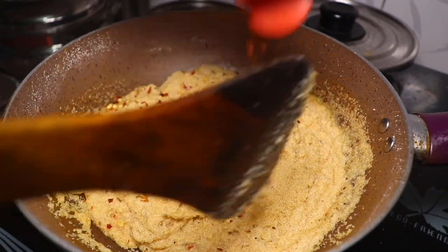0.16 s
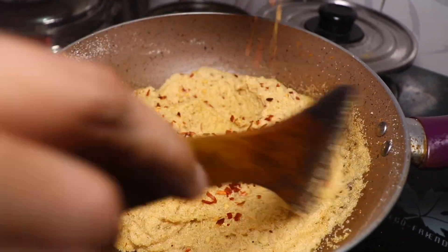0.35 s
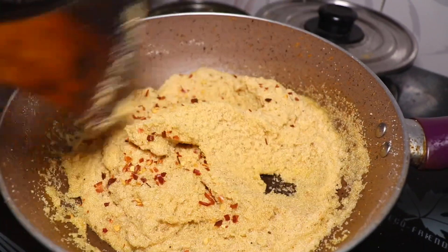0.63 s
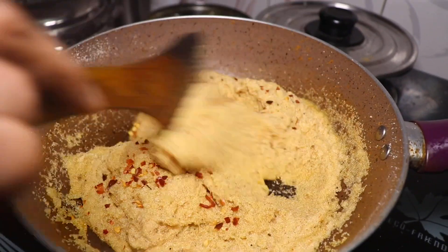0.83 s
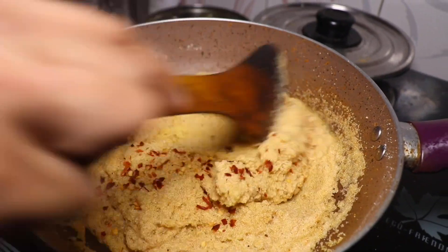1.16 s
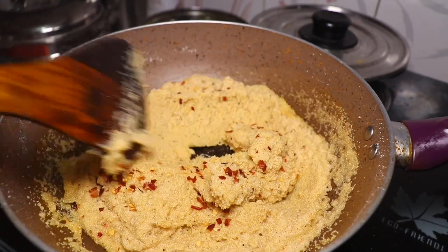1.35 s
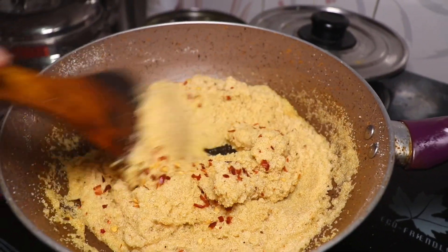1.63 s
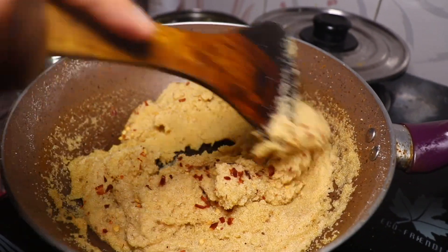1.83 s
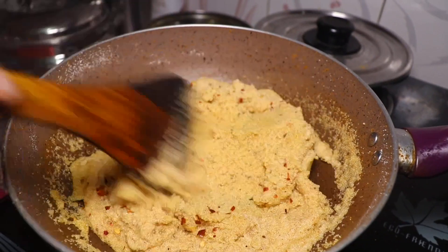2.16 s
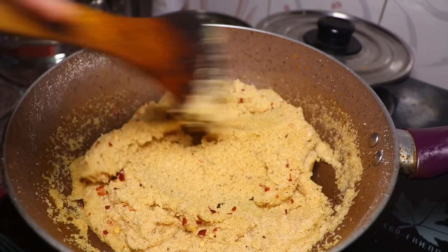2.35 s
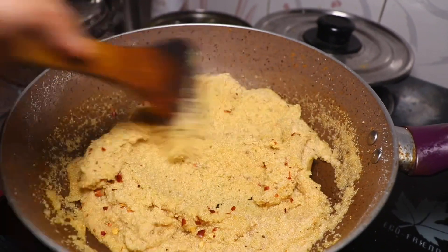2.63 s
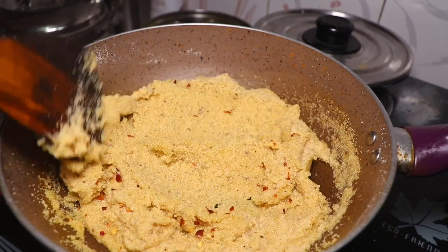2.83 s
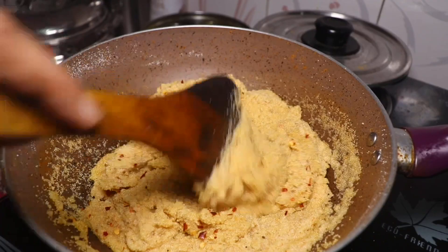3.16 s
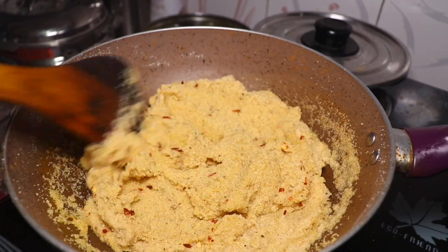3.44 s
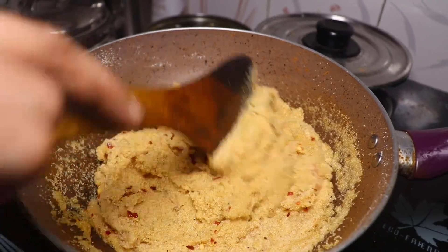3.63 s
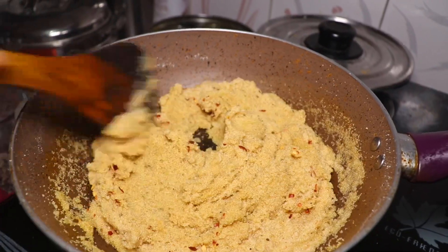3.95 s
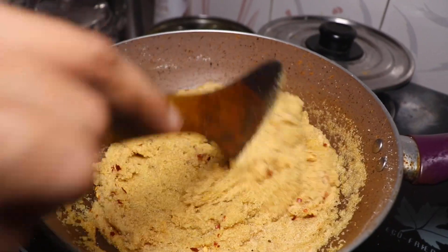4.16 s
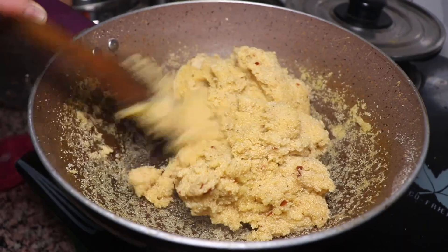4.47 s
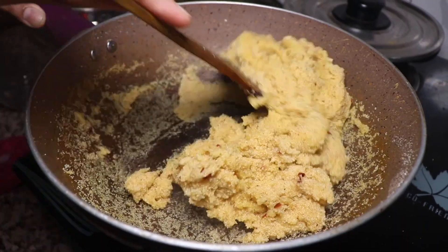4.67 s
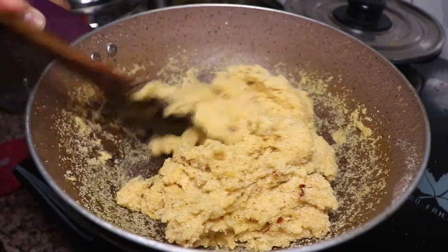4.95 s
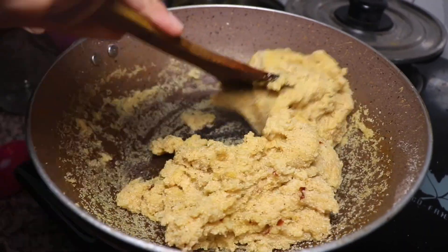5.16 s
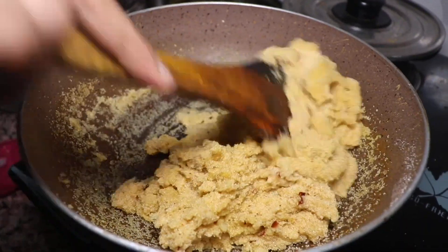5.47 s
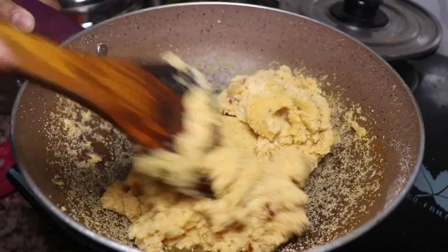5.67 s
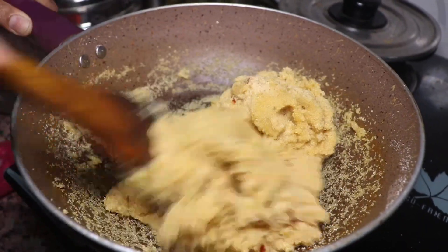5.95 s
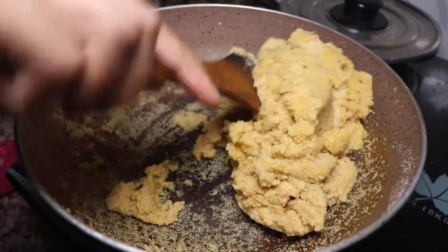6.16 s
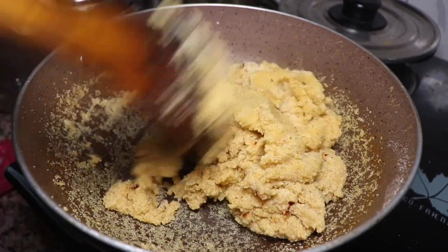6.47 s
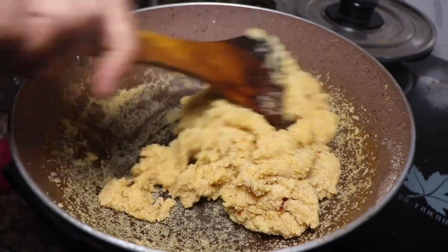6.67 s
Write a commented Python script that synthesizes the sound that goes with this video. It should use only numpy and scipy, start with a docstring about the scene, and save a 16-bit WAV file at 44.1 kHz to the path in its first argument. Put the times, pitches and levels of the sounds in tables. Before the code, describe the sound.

From 0 to about 0.7 seconds, dry, bright rustling with tiny sharp ticks sits over a quiet room hush and a faint narrow hiss. At 0.8 a wooden spatula first knocks the coated pan, and stirring begins. Short woody knocks with a quickly damped metallic ring come in uneven clusters around 1.3, 1.7, 2.1, 2.6 and 3.0, the hits at 1.67 and 3.04 stronger. Dull, gritty drags through thick dough join them, with low stove rumble swelling under the pushes. A thin hiss returns near 3 seconds. After sparser knocks from 3.5, a very loud, hard clack lands at 4.45 with a rough scraping tail. Knocks then crowd together until 5.3, with a strong one at 5.04. Further hits at 5.84 and 6.0 bring coarse scraping, then softer taps until 6.8. Close microphone, small tiled kitchen, short tail.

```python
"""Dry rustling, room hush and a faint hiss come first; then wood knocks and scrapes as thick dough is stirred.
A wooden spatula in a coated pan, an arm's length away in a small kitchen, rings metal modes the dough damps.
Random clicks drive the same modes for the scrape, and each push through the dough swells a low stove rumble.
Filtered random grains make the rustle and the bright top of some knocks, the hush is bands of noise,
and the narrow hiss is noise on a drifting pitch."""
import sys
import numpy as np
from scipy import signal
from scipy.io import wavfile
from scipy.ndimage import uniform_filter1d

SR = 44100
rng = np.random.default_rng(int(sys.argv[2]) if len(sys.argv) > 2 else 0)


def generate_wav(signal):
    """Clip the signal to [-1, 1] and save it as 16-bit WAV at the path in sys.argv[1]."""
    frames = np.transpose(np.atleast_2d(signal))
    scaled = np.clip(frames, -1, 1) * 32767
    pcm = np.round(scaled).astype(np.int16)
    wavfile.write(sys.argv[1], SR, pcm)


N = 300232  # length in samples

# Colour of the room hush. Each row: frequency in Hz, relative level in dB for equal widths in Hz.
HUSH_COLOUR = [(15, -35), (25, 7), (40, 5), (87, -28), (166, -20), (242, 7.5), (384, -2), (591, 2),
               (818, -10), (1040, -7.5), (4870, -18.5), (9570, -16.5), (13600, -19.5), (16000, -8)]
HUSH_DB = -63
# Bursts of dry high noise; some are the bright top of a knock.
# Each row: peak time in seconds, gain in dB, seconds to rise 20 dB, seconds to fall 20 dB.
TREBLE_BURSTS = [(0, -44, .02, .03), (.022, -49, .03, .07), (.13, -47.5, .014, .09), (.188, -48, .03, .15),
                 (.238, -50, .1, .07), (.38, -55.5, .18, .14), (.678, -55, .1, .1), (.81, -58, .02, .015),
                 (1.68, -65, .02, .12), (2.11, -70, .04, .2), (2.3, -70, .2, .3), (3.63, -69, .02, .25),
                 (4.09, -66, .1, .1), (4.39, -62, .01, .05), (4.5, -65.5, .05, 1.5), (5.04, -62, .008, .03),
                 (5.11, -67, .15, .5), (5.265, -60, .06, .2), (5.52, -66.5, .06, .12),
                 (5.685, -60, .05, .09), (5.77, -64, .2, .12), (6.02, -60, .015, .09), (6.18, -68, .5, .11),
                 (6.29, -69, .02, .6), (6.4, -65.5, .1, .2), (6.56, -63, .012, .012),
                 (6.625, -60, .006, .03), (6.73, -73.5, .15, .06), (6.79, -65, .035, .12)]
# Faint rustle between the bursts. Each row: time in seconds, gain in dB.
RUSTLE_REST = [(0, -66), (.5, -67), (.78, -74), (1.3, -76), (2.6, -78), (3.1, -75), (4.3, -77), (5, -85),
               (6.81, -86)]
# Single dry ticks in the treble. Each row: time in seconds, peak in dB.
TICKS = [(0.0233, -32.5), (0.1236, -48), (0.189, -41), (0.229, -30), (0.3436, -46), (0.5611, -44),
         (0.673, -40), (0.7114, -42), (5.104, -46), (5.283, -39), (5.521, -45), (5.681, -40),
         (6.6191, -32.5)]
# Ways the pan and spatula ring. Each row: frequency in Hz, relative strength in dB,
# seconds to fade by 60 dB before the dough damps it further.
PAN_MODES = [(242.2, -0.5, 0.58), (319, 2.5, 0.23), (482, -1, 0.36), (560.3, -3.5, 0.36), (616, -1.5, 0.06),
             (650.6, -2, 0.15), (790.7, 4.5, 0.048), (870, -1, 0.094), (962.7, 1, 0.053), (1100, -6.5, .1),
             (1232, -7, 0.055), (1360, -2.5, 0.04), (1576, -3, 0.052), (1750, -8.5, 0.11),
             (1810, -7, 0.091), (1972, 1.5, 0.027), (2130, -3, 0.049), (2310, -2.5, 0.036),
             (2394, -7, 0.16), (2491, 0.5, 0.03), (2814, 6, 0.02), (3180, 11.5, 0.02), (3870, 1.5, 0.02),
             (4135, 2.5, 0.07), (4814, 4, 0.017), (5400, -9, 0.017), (6675, 14.5, 0.048),
             (7220, -25.5, 0.016)]
# Borders between thud, body, ring and crack, in Hz.
BAND_EDGES_HZ = [400, 1200, 3000]
# Strokes through the dough. Each row: peak time in seconds, low scrape, high scrape and fine grit gains in dB
# (before the trims in scrape), seconds to fall 20 dB.
STROKES = [(0.83, -47.5, -54, -62, .045), (0.95, -52, -50.5, -65, .11), (1.33, -53, -60, -65.5, .35),
           (1.74, -58, -61, -69, .6), (2.12, -49.5, -61, -68, .27), (2.3, -66, -61, -72, .6),
           (2.64, -53, -62, -70, .25), (3.06, -44, -51, -65, .19), (3.56, -55, -63, -70, .2),
           (3.69, -62, -61, -69, .3), (3.88, -53, -62, -68, .2), (4.1, -43.5, -46, -64, .12),
           (4.26, -59, -68, -73, .2), (4.49, -51, -62, -63, .4), (4.59, -47, -54, -63, .4),
           (4.8, -55, -59, -68, .3), (4.93, -54, -68, -73, .3), (5.06, -43.5, -49, -70, .15),
           (5.68, -57, -70, -64, .12), (6.04, -46.5, -58, -74, .3), (6.33, -60, -70, -67.5, .2),
           (6.79, -59, -66, -63, .2)]
STROKE_RISE_S = 0.035  # to rise 20 dB
# Steady drag of the blade between strokes. Each row: time in seconds, low scrape gain in dB,
# fine grit gain in dB (before the trims in scrape).
DRAG_LEVEL = [(0, -70, -66), (.19, -60, -63.5), (.55, -60, -69), (.65, -69, -70), (1.1, -69, -72),
              (1.25, -63, -71), (1.6, -65, -70), (2.5, -64, -73), (2.9, -62, -68), (3.3, -72, -71),
              (4.1, -72, -72), (4.4, -62, -71), (5.36, -61, -69), (5.52, -74, -85), (5.75, -67, -68),
              (5.97, -88, -88), (6.45, -65, -72), (6.81, -67, -76)]
DRAG_HIGH_DB = -2  # high scrape compared with low scrape
# Short rough scrapes, and the noisy tail of the loudest knock. Each row: start in seconds,
# start of the fade-out in seconds, low scrape, high scrape and fine grit gains in dB.
ROUGH_SCRAPES = [(1.282, 1.312, -46.5, -50.5, -67), (1.721, 1.748, -49, -55, -76),
                 (4.466, 4.51, -48, -50, -53), (4.533, 4.589, -49, -50, -59), (4.59, 4.656, -46, -57, -68),
                 (5.038, 5.15, -67, -66, -74), (6.013, 6.08, -53.5, -51.5, -60.5),
                 (6.079, 6.119, -44, -56, -67), (6.111, 6.16, -47, -55.5, -64.5),
                 (6.365, 6.415, -54.5, -67, -75)]
# Pushes that shake the stand. Each row: peak time in seconds, level in dB.
PUSHES = [(.2, -66), (.83, -62), (.95, -60), (1.12, -56.5), (1.33, -56), (1.52, -61), (1.78, -57),
          (1.93, -61), (2.48, -67), (2.63, -62), (2.92, -62), (3.07, -59.5), (3.2, -60), (3.6, -60),
          (3.73, -64.5), (4.21, -63), (4.48, -59), (4.65, -59), (4.84, -63), (5.06, -58), (5.22, -63),
          (5.57, -64), (5.67, -63.5), (5.87, -64), (6.05, -58), (6.13, -59), (6.22, -58), (6.45, -63.5)]
PUSH_RISE_S, PUSH_FALL_S, STOVE_REST_DB = 0.12, 0.18, -72  # to rise and fall 20 dB; level at rest
# A faint narrow hiss, in three spells. Each row: time in seconds, centre in Hz, gain in dB before the part gains.
WHISTLE = [
    [(0.12, 1450, -68), (0.202, 1530, -68), (0.302, 1450, -63.5), (0.374, 1460, -64), (0.548, 1450, -70.5),
     (0.62, 1460, -73)],
    [(2.78, 1450, -82), (2.824, 1440, -71), (2.936, 1400, -67), (3.008, 1550, -72), (3.114, 1510, -69),
     (3.304, 1508, -66.5), (3.46, 1440, -65), (3.56, 1470, -68)],
    [(4.24, 1480, -69), (4.4, 1460, -69)],
]
# How often the noise in each spell takes a new value, per second: faster makes a wider hiss.
WHISTLE_RATES_HZ = [1100, 420, 400]
# Knocks. Each row: time in seconds, peak aimed for in dB, then relative levels in dB of the thud under 400 Hz,
# the body to 1.2 kHz, the ring to 3 kHz and the crack above, then the strongest body, ring and crack
# frequencies in Hz, first contact compared with the skid in dB, skid decay in seconds, and
# the dough's damping as seconds to fade by 60 dB.
KNOCKS = [(0.767, -58, -8, -2, -3, 6, 692, 1370, 4200, 2, 0.0042, 0.15),
          (0.802, -30.5, -17, -12, -12.5, -15, 604, 1180, 3220, 10, 0.0073, 0.1),
          (0.843, -42, -12, -8, -23, -13, 1110, 1200, 3200, -8, 0.005, 0.085),
          (0.932, -36, -9, -3, -9, -8, 710, 2170, 6000, -12, 0.0033, 0.11),
          (1.281, -30, -21.5, -8.5, -8, -16, 780, 2160, 3040, -8, 0.0043, 0.12),
          (1.299, -37, -9, -11, -19, -16.5, 640, 1200, 3010, 8, 0.0038, 0.27),
          (1.398, -39, -23, -15, -21, -15.5, 700, 2540, 3870, -17, 0.0047, 0.11),
          (1.442, -45, -12, -7, -12, -12, 660, 1280, 3740, -7, 0.013, 0.12),
          (1.67, -21, -31, -5.5, -17, -30.5, 1120, 1360, 3830, 5.5, 0.008, 0.054),
          (1.703, -40, -24, -6, -1, -15, 915, 2860, 3020, -9, 0.0057, 0.088),
          (1.712, -27, -16, -7.5, -7.5, -16, 690, 2390, 3230, -2.5, 0.0042, 0.2),
          (2.079, -41.5, -18, -7.5, -4, -14, 991, 2380, 3000, 5, 0.005, 0.12),
          (2.109, -36.5, -30, -0.5, -1.5, -34, 686, 1270, 3020, -14, 0.0039, 0.11),
          (2.171, -38, -18.5, -10.5, -16, -23, 637, 1350, 2900, -12, 0.0052, 0.31),
          (2.325, -46.5, -12, -7, -19, -28, 496, 1250, 4160, 6, 0.005, 0.079),
          (2.614, -36, -14.5, -9, -10.5, -16.5, 785, 1230, 3000, 4, 0.005, 0.1),
          (2.678, -32.5, -24, -7.5, -9, -21.5, 680, 1360, 2960, -3, 0.004, 0.35),
          (2.758, -45, -24, -30, -15, -18, 627, 2290, 7830, 4, 0.0027, 0.089),
          (2.82, -41.5, -16, -9, -17, -14, 650, 1300, 4200, 0.5, 0.0044, 0.21),
          (2.954, -36, -10, -5.5, -9, -10, 1110, 1300, 3140, -1, 0.0086, 0.18),
          (3.022, -27.5, -5, 6, -7, -27, 1040, 1370, 3220, -3.5, 0.0034, 0.072),
          (3.041, -23, -20.5, -8, -8, -16.5, 850, 2400, 2950, -11, 0.0042, 0.18),
          (3.145, -36, -32, -9, -17.5, -13.5, 644, 1840, 5060, -13, 0.0055, 0.24),
          (3.184, -44, -18, -4, -10, -15, 630, 1570, 3780, -2, 0.0055, 0.12),
          (3.518, -42, -15, -8, -16, -26, 590, 2950, 3160, -6, 0.0078, 0.14),
          (3.551, -37.5, -10.5, -9, -18, -19, 750, 1220, 3200, 1.5, 0.0081, 0.18),
          (3.668, -38.5, -19, -10, -15, -13, 660, 1160, 3950, -1, 0.0071, 0.085),
          (3.858, -29, -20.5, -3.5, -4, -10.5, 670, 2180, 3480, 7, 0.0056, 0.12),
          (4.085, -32.5, -23, -10.5, -9.5, -17.5, 590, 1550, 3020, 0, 0.0094, 0.16),
          (4.149, -40.5, -15, -9.5, -15, -12, 655, 2830, 4250, -10, 0.0046, 0.092),
          (4.328, -48, -14, -11, -14, -28, 875, 1460, 7140, -2, 0.0071, 0.12),
          (4.386, -51.5, -18, -6, -23, -12, 794, 1600, 5360, -2, 0.004, 0.12),
          (4.449, -5, -36, -20.5, -10.5, -18.5, 840, 1936, 5130, -1.5, 0.0064, 0.11),
          (4.51, -24.5, -16, -15, -7, -20, 789, 1910, 4120, 22, 0.005, 0.12),
          (4.631, -27.5, -16.5, -5, -14, -26, 810, 2470, 3060, 7, 0.0063, 0.2),
          (4.683, -29, -40, -8.5, -8, -19, 836, 2400, 3960, 10, 0.0043, 0.14),
          (4.727, -28.5, -43, -1.5, -11.5, -29, 844, 1290, 3040, 0, 0.0044, 0.19),
          (4.914, -44, -19, -1, -3, -25, 780, 1310, 6870, 0, 0.0045, 0.12),
          (4.941, -32, -22, -7, -9.5, -27, 1100, 1330, 3480, 5, 0.007, 0.068),
          (4.977, -30.5, -11, 1, 1, -44, 720, 1700, 3000, -5, 0.008, 0.12),
          (5.037, -21.5, -16.5, -3, -4, -3, 1020, 1710, 3230, 5, 0.0039, 0.13),
          (5.109, -37, -18, -9.5, -9.5, -16, 821, 1210, 2970, 5, 0.005, 0.12),
          (5.159, -38.5, -25.5, -1, -24, -23, 750, 1190, 3010, -14.5, 0.0092, 0.18),
          (5.247, -32.5, -20, -5.5, -17.5, -30.5, 850, 1210, 3000, 7, 0.0035, 0.15),
          (5.413, -38, -22.5, -5, -15, -24.5, 738, 1590, 3000, 5, 0.0065, 0.1),
          (5.68, -45, -22.5, -14.5, -17, -12.5, 796, 2440, 4950, -3, 0.011, 0.13),
          (5.746, -52, -7.5, -2, -18.5, -19, 802, 1200, 6170, -5, 0.005, 0.11),
          (5.843, -25.5, -28, -7, -13.5, -17.5, 950, 2680, 3210, 0, 0.0043, 0.36),
          (6.016, -32, -3.5, -5.5, -6.5, -17.5, 576, 1300, 6270, 4, 0.0033, 0.048),
          (6.052, -32.5, -2, -9, -18, -3, 799, 1810, 5000, -4, 0.0027, 0.14),
          (6.384, -38.5, -15, -10, -17, -17, 570, 1590, 3110, 8.5, 0.0084, 0.11),
          (6.55, -47, -8, 4.5, -24, -10, 786, 1200, 3090, 3, 0.0044, 0.095),
          (6.596, -51.5, -21, -26, -27, -21, 538, 1675, 6410, 5, 0.0046, 0.12),
          (6.649, -46.5, -25.5, -15, -8.5, -20, 611, 2020, 3260, -7, 0.0037, 0.12),
          (6.73, -34.5, -24, -5.5, -9, -21.5, 794, 1213, 3050, -5, 0.0071, 0.1)]
CREST_DB = 6.5  # peak above the loudest 8 ms
ROOM_T60_S, ROOM_TREBLE_T60_S, ROOM_DB = 0.34, 0.31, -18
# Brief drops in level. Each row: start in seconds, end in seconds, gain in dB.
DROPOUTS = [(4.373, 4.379, -13), (4.44, 4.451, -28)]
SIDE_HISS_DB = -76.5
TOP_HZ = 15800


def undb(db):
    """Turn decibels into a plain multiplier."""
    return 10 ** (np.asarray(db) / 20)


def level(x, db):
    """Set the average (RMS) level of a sound."""
    return x * undb(db) / np.sqrt(np.mean(x ** 2))


def band(x, lo_hz, hi_hz, order=2):
    """Keep the frequencies between two limits."""
    sos = signal.butter(order, [lo_hz, min(hi_hz, 0.45 * SR)], "bandpass", fs=SR, output="sos")
    return signal.sosfilt(sos, x)


def fade(t, t60):
    """Die away by 60 dB in t60 seconds."""
    return np.exp(-np.log(1000) * t / t60)


def curve(rows):
    """Table columns at every sample; -150 outside the rows, which is silence for a level in dB."""
    s, *columns = np.transpose(rows)
    now = np.arange(N) / SR
    return [np.interp(now, s, column, left=-150, right=-150) for column in columns]


def swells(peak_s, db, rise_s, fall_s):
    """Gain of events that rise to a peak and fall away, straight in dB, summed in power."""
    def as_column(values):
        return np.reshape(values, (-1, 1))

    coarse = np.arange(0, N, 32)  # every 32nd sample is enough
    after = coarse / SR - as_column(peak_s)
    spans = np.where(after < 0, -after / as_column(rise_s), after / as_column(fall_s))
    gain = np.sqrt(np.sum(undb(as_column(db) - 20 * spans) ** 2, axis=0))
    return np.interp(np.arange(N), coarse, gain)


def grit(size, per_s, scatter_db):
    """Random clicks, mostly small and now and then large."""
    hit = rng.random(size) < per_s / SR
    return hit * rng.standard_normal(size) * undb(scatter_db * rng.exponential(size=size))


def walk(rate):
    """A random wander: values held for 1 / rate seconds, then smoothed twice; spread near 1."""
    k = int(SR / rate)
    steps = np.repeat(rng.standard_normal(N // k + 1), k)
    return 1.3 * uniform_filter1d(uniform_filter1d(steps, k), k)[:N]


def add(out, x, s):
    """Mix a short sound into a longer one, starting at s seconds."""
    i = int(s * SR)
    out[i:i + len(x)] += x[:N - i]


def hush():
    """Half-octave bands of room noise that swell together and flicker alone."""
    out, swell = 0, walk(1.7)
    table_hz, table_db = np.transpose(HUSH_COLOUR)
    for hz in 28 * 2 ** np.arange(0, 9.6, 0.5):
        noise = band(rng.standard_normal(N), hz / 2 ** 0.25, hz * 2 ** 0.25)
        colour_db = np.interp(np.log(hz), np.log(table_hz), table_db)
        out = out + noise * undb(colour_db + 0.23 * swell + 0.88 * walk(21))
    return level(out, HUSH_DB)


def dry_treble():
    """Dense grains near 12 kHz with a thin skirt below, for the rustle and some knock tops, and a few lone ticks."""
    grains = grit(N, 8800, 1.5) * undb(2.7 * walk(120))
    bright = level(band(grains, 9350, 14900), 0)
    skirt = level(band(grains, 1400, 13500, order=1), -4.5)
    rest = undb(curve(RUSTLE_REST)[0])
    out = (bright + skirt) * np.hypot(rest, swells(*np.transpose(TREBLE_BURSTS)))
    t = np.arange(400) / SR
    for s, peak_db in TICKS:
        tick = band(rng.standard_normal(len(t)) * fade(t, 0.006), 9000, 15500)
        add(out, tick * undb(peak_db) / np.abs(tick).max(), s)
    return out


def pan_modes(length_s=0.35):
    """One dying sine for each way the metal rings, and the band it belongs to."""
    hz, db, t60 = np.transpose(PAN_MODES)[:, :, None]
    t = np.arange(int(length_s * SR)) / SR
    modes = undb(db) * np.sin(2 * np.pi * hz * t) * fade(t, t60)
    return t, modes, np.digitize(hz[:, 0], BAND_EDGES_HZ)


def drag_gains():
    """Low, high and fine scrape gains: the strokes over the steady drag."""
    peak_s, *stroke_db, fall_s = np.transpose(STROKES)
    low_db, grit_db = curve(DRAG_LEVEL)
    steady = undb([low_db, low_db + DRAG_HIGH_DB, grit_db])
    return np.hypot(steady, [swells(peak_s, db, STROKE_RISE_S, fall_s) for db in stroke_db])


def rough_gains():
    """Low, high and fine gains of the short rough scrapes and the loudest knock's noisy tail."""
    gains, now = np.zeros((3, N)), np.arange(N) / SR
    for start, end, *rough_db in ROUGH_SCRAPES:
        rise, fall = (now - start) / 0.01, (end - now) / 0.042 + 1
        gains += undb(rough_db)[:, None] * np.clip(np.minimum(rise, fall), 0, 1) ** 2
    return gains


def scrape(drag):
    """Stick-slip clicks of wood on the coating drive heavily damped modes; the finest come through as grit."""
    t, modes, group = pan_modes()
    slips = grit(N, 5000, 1.5) * undb(2.8 * walk(70))
    # groups 1 and 2 are the body and the ring
    low, high = (signal.fftconvolve(slips, modes[group == k].sum(0) * fade(t, 0.062))[:N] for k in (1, 2))
    high = level(band(high, 1200, 2490, order=3), 0)
    fine = level(band(slips + 0.45 * rng.standard_normal(N), 2800, 7100, order=1), 0)
    # through the dough the drag is duller than the rough part
    dull = level(band(low, 303, 1200), -3.7) * drag[0]
    dull = dull + undb(-6.5) * high * drag[1] + undb(0.5) * fine * drag[2]
    gains = rough_gains()
    rough = level(band(low, 580, 1350), 0) * gains[0] + high * gains[1] + fine * gains[2]
    return dull + rough


def stove():
    """The pan stand shudders near 85 Hz when the dough is pushed."""
    push = np.hypot(undb(STOVE_REST_DB), swells(*np.transpose(PUSHES), PUSH_RISE_S, PUSH_FALL_S))
    return level(band(rng.standard_normal(N), 56.3, 105), 0) * push


def whistle():
    """Slow noise carried on a drifting pitch: a hiss a few hundred Hz wide."""
    out = 0
    for rows, rate_hz in zip(WHISTLE, WHISTLE_RATES_HZ):
        hz, db = curve(rows)
        # a weaker partner rides above it
        for ratio, part_db in ((1, 2), (1.4, -9.5)):
            turn = 2 * np.pi * np.cumsum(ratio * hz * (1 + 0.04 * walk(25))) / SR
            hiss = walk(rate_hz) * np.cos(turn) + walk(rate_hz) * np.sin(turn)
            out = out + undb(db + part_db) * hiss
    return out


def blur(force, t, lo_hz, hi_hz, t60, db, order=2):
    """Many small modes merge into noise that follows the force and dies fast."""
    power = signal.fftconvolve(force ** 2, fade(t, t60) ** 2)[:len(t)]
    noise = rng.standard_normal(len(t)) * np.sqrt(np.abs(power))
    return level(band(noise, lo_hz, hi_hz, order=order), db)


def knocks():
    """Each blow is a first contact and a few ms of skid; the spot struck favours some modes, the dough damps all."""
    out, (t, modes, group) = np.zeros(N), pan_modes()
    spot = rng.standard_normal((len(KNOCKS), len(PAN_MODES)))
    hz = np.array(PAN_MODES)[:, 0]
    edges = [160, *BAND_EDGES_HZ, 15000]
    for row, weight in zip(np.array(KNOCKS), spot):
        s, peak_db = row[:2]
        band_db, best_hz = row[2:6], row[6:9]
        contact_db, skid, t60 = row[9:]
        force = np.exp(-t / max(skid, 0.0005))
        force /= np.sqrt(np.sum(force ** 2))
        force[0] += undb(contact_db)
        push = force * np.r_[1, rng.standard_normal(len(t) - 1)]

        # modes far from the strongest one in their band are weaker
        octaves_off = np.log2(hz / np.r_[hz[0], best_hz][group])
        gain = np.sign(weight) * undb(2.3 * weight - np.minimum(28 * np.abs(octaves_off), 18))
        parts = []
        for k in range(4):
            # the lowest modes move the whole pan, so the dough damps them less
            damping = fade(t, t60 * (3 if k == 0 else 1))
            ring = (gain * (group == k)) @ modes * damping
            parts.append(level(signal.fftconvolve(ring, push)[:len(t)], 0))
        _, ring_hz, crack_hz = best_hz
        parts[2] += blur(force, t, ring_hz / 1.77, ring_hz * 1.24, 0.087, -0.45, order=3)
        parts[3] += blur(force, t, crack_hz / 1.27, crack_hz * 1.36, 0.053, 13.5)
        parts[3] += blur(force, t, crack_hz * 0.98, 15000, 0.057, 1.32)

        blow = 0
        for part, db, lo, hi in zip(parts, band_db, edges, edges[1:]):
            blow = blow + level(band(part, 0.71 * lo, 1.1 * hi), db)
        loudest = np.sqrt(uniform_filter1d(blow ** 2, size=350).max())  # over 8 ms
        add(out, blow * undb(peak_db - CREST_DB) / loudest, s)
    return out


def room(x):
    """Tiled walls: a noise tail whose treble dies sooner."""
    t = np.arange(SR // 2) / SR
    low = band(rng.standard_normal(len(t)), 130, 2180) * fade(t, ROOM_T60_S)
    high = band(rng.standard_normal(len(t)), 2800, 8300) * fade(t, ROOM_TREBLE_T60_S)
    tail = (low + 0.46 * high) * (t > 0.006)  # the tail starts after 6 ms
    tail *= undb(ROOM_DB) / np.sqrt(np.sum(tail ** 2))
    return x + signal.fftconvolve(x, tail)[:N]


def scene():
    """Mix all the sounds, the same in both channels; only knocks() and scrape() get the room's tail."""
    pan = room(knocks() + scrape(drag_gains()))
    mid = hush() + dry_treble() + pan + stove() + whistle()
    return np.array([mid, mid])


def record(dry):
    """Faint noise differs between the channels, the level drops twice, and the top is cut."""
    noise = rng.standard_normal(N)
    hiss = level(band(noise, 2600, 17000, order=1), SIDE_HISS_DB)
    side = hiss + level(band(noise, 30, 500, order=1), -84.5)
    t, gain_db = np.arange(N) / SR, np.zeros(N)
    for start, end, depth_db in DROPOUTS:
        gain_db[(t > start) & (t < end)] = depth_db
    # opposite signs in left and right; the drops get softened edges
    wet = (dry + side * np.array([[1], [-1]])) * undb(uniform_filter1d(gain_db, size=60))
    return signal.sosfilt(signal.ellip(10, 0.2, 70, TOP_HZ, fs=SR, output="sos"), wet)


dry = scene()
out = record(dry)
generate_wav(out)
```